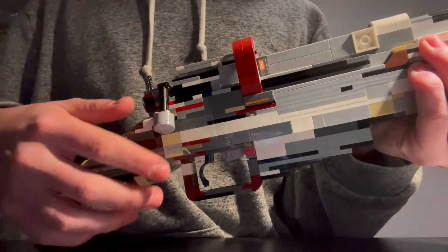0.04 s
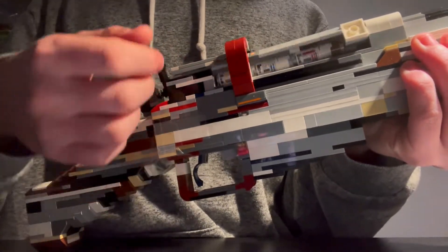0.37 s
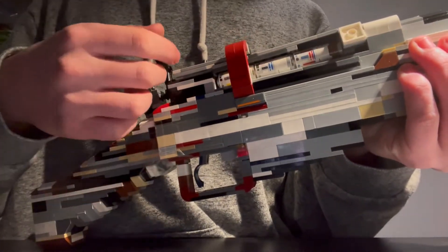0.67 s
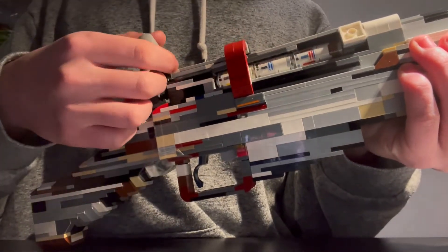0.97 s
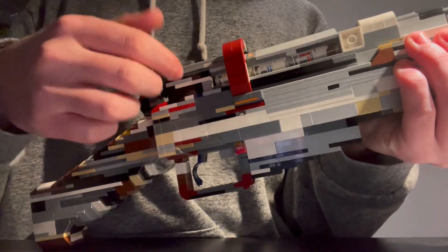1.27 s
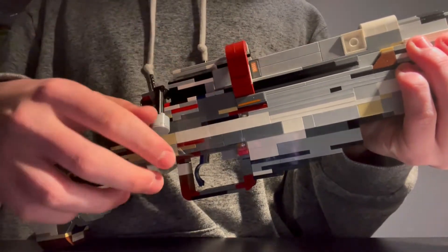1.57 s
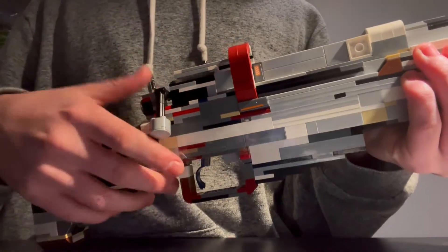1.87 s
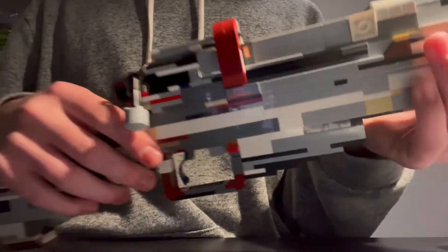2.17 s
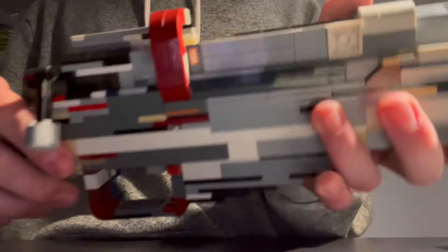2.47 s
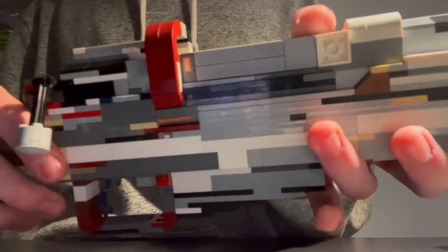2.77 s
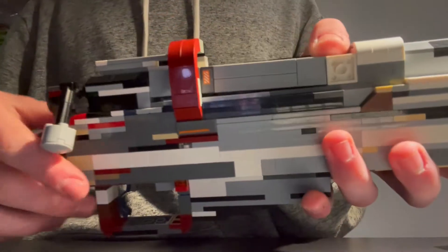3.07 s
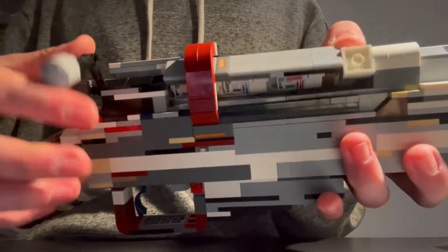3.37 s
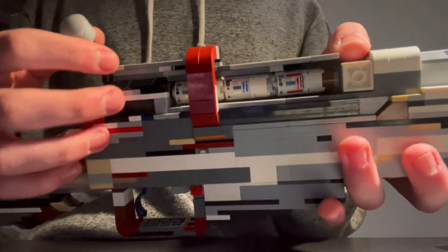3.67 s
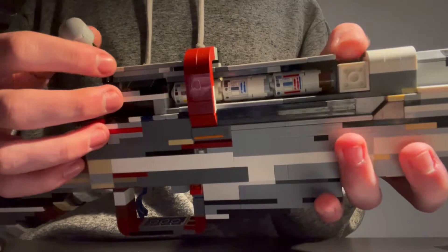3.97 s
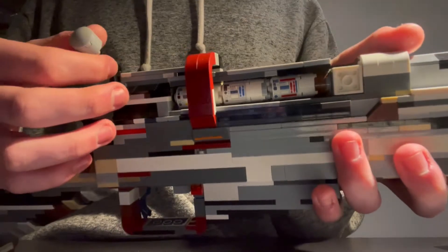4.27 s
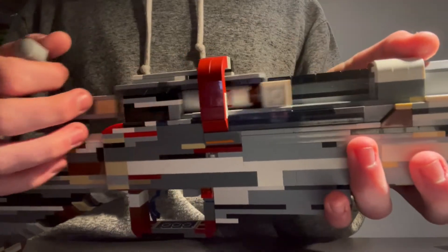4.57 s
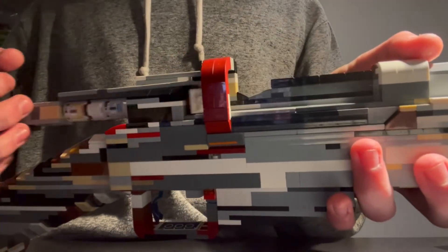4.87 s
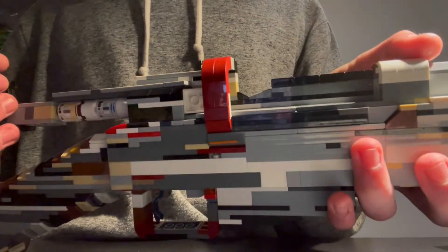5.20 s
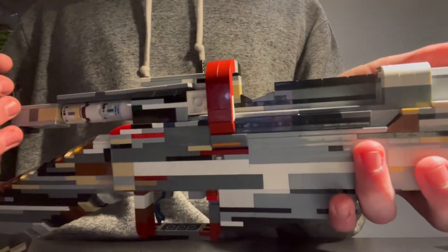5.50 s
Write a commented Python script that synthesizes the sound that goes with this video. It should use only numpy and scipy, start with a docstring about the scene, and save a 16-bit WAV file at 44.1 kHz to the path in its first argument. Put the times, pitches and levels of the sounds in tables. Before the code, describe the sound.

Hands handle a model rifle made of plastic bricks, close to a stereo microphone in a small room with a faint low hum. For the first two seconds, loose bricks click lightly and irregularly over soft finger rubs, with one sharper bolt clack at about 1.1 seconds. From 2 to 2.7 seconds a palm brushes the barrel with a faint hiss. A hollow thump lands at 2.75 seconds, and around 3 seconds fingertips stick and slip, making the body groan and rumble briefly. The bolt clacks sharply from 3.3 to 3.6 seconds, loudest near 3.5, amid rattling bricks. Another short finger groan comes around 4.1 seconds. From 4.3 seconds, sliding parts scrape under a dense run of clicks, with hard clacks at about 4.4, 4.7 and 4.9 seconds. A couple of faint ticks and a soft bump follow, ending near 5.5 seconds.

```python
"""Fingers rub and thump a hollow plastic body over a faint hum, while loose bricks click and rattle.
Hands are working the bolt of a model rifle made of plastic bricks, close by in a small quiet room.
Fingertips stick and slip, so the body groans and rumbles. Sliding parts scrape as their edges catch,
the bolt clacks against its stops, and a palm brushes along the barrel with a soft hiss."""
import sys
import numpy as np
from scipy import signal
from scipy.fft import rfft, irfft, next_fast_len
from scipy.io import wavfile
from scipy.ndimage import map_coordinates

SR = 44100
rng = np.random.default_rng(int(sys.argv[2]) if len(sys.argv) > 2 else 0)


def output_pcm(signal):
    """Save a mono or channel-first signal as 16-bit PCM at the path in sys.argv[1].

    Samples are clipped to [-1, 1] before scaling.
    """
    pcm = np.clip(np.atleast_2d(signal).T, -1, 1) * 32767
    wavfile.write(sys.argv[1], SR, np.round(pcm).astype(np.int16))


N = 244314

# Levels in the tables are relative: the functions scale them further.
# tone of the air noise: f/Hz, level/dB
AIR_TONE = [(25, -27), (48, -23.5), (87, -9.5), (123, -12), (170, -21.5), (400, -24), (800, -30.5),
            (1000, -36), (5400, -45.5), (16000, -60)]
# mains hum: f/Hz, level/dB
HUM_NOTES = [(59.3, -78), (118.6, -79)]
# fingers dragging on the body: start t/s, end t/s, midway level/dB, swell/dB, groan f/Hz
FINGER_DRAGS = [(0.038, 0.318, -60, -7.5, 200), (0.515, 0.617, -59, -11.5, 250),
                (1.304, 1.564, -61.5, -8, 225), (1.932, 1.99, -45.5, 0, 180), (2.912, 2.989, -39, 11, 244),
                (2.996, 3.076, -31.5, 0.5, 240.3), (3.089, 3.12, -40, -3.5, 250),
                (3.144, 3.43, -52.5, 1, 238), (3.632, 3.863, -52.5, -7.5, 262),
                (4.02, 4.078, -43.5, 6, 255), (4.085, 4.12, -39, 1, 240), (4.126, 4.189, -38.5, -2, 254),
                (4.568, 4.84, -58, 11, 265)]
# how the hollow body rings: f/Hz, width/Hz, knocked level/dB, rubbed level/dB
BODY_RINGS = [(255.3, 33, 3.5, -12.5), (385, 18, 0, -12.5), (475.8, 53, -1.5, -15), (647.6, 42, -6, -20.5),
              (758, 92, -4.5, -16.5)]
# how the whole model booms against the hands: f/Hz, width/Hz, level/dB
BOOM_RINGS = [(66.5, 18, 0.5), (117.7, 7.4, 0), (185, 38, -8.5)]
# how the bricks ring: f/Hz, width/Hz, level/dB
BRICK_RINGS = [(967, 33, 6), (1300, 31, 4.5), (1677, 93, -3), (2610, 83, 2.5), (3470, 260, -4),
               (3728, 110, 2), (4500, 1600, 1), (7000, 1400, 5), (10650, 420, -2)]
# tone of the rough scraping hiss: f/Hz, level/dB
GRIT_TONE = [(400, 6), (900, -4), (2300, 2), (3600, -10), (7500, -12.5), (16000, -37.5)]
# soft blows of the hands: t/s, level/dB, extra level/dB for the hollow ring
HAND_BLOWS = [(0.065, -48.5, 11), (1.518, -44.5, 0), (1.95, -40, 6), (2.746, -22, 13.5),
              (2.756, -24.5, 17.5), (4.645, -40.5, -2), (4.891, -36.5, 1), (5.364, -42.5, -31.5)]
# bricks sliding on bricks: start t/s, end t/s, midway level/dB, swell/dB
BRICK_SLIDES = [(0.12, 0.26, -62, -2), (0.48, 0.59, -68, -1), (1.075, 1.15, -43, -13),
                (2.02, 2.2, -63.5, -9), (2.728, 2.83, -49, -11), (3.495, 3.57, -47.5, -3.5),
                (4.29, 4.56, -49, 1.5), (4.57, 4.87, -60.5, -5)]
# loose bricks tapping: t/s, clack level/dB, clack f/Hz, snap level/dB above the clack
BRICK_TAPS = [(0.1292, -32.5, 1480, -18), (0.189, -33, 1320, -20), (0.2012, -37, 1500, -32),
              (0.2304, -34, 1510, -13), (0.319, -42, 1090, -16), (0.401, -54.5, 1230, -24),
              (0.4738, -35.5, 1670, -17), (0.682, -56, 1530, -21), (1.016, -47, 1340, 1),
              (1.09, -36.5, 1000, -2.5), (1.1727, -31, 1470, -17), (1.2385, -43.5, 1440, -42),
              (1.276, -46.5, 1375, -17), (1.3368, -36, 1400, -13), (1.3936, -40, 1240, -37.5),
              (1.4274, -37.5, 1430, -11.5), (1.523, -36.5, 1360, -10.5), (1.5939, -52, 1260, -6),
              (1.951, -42.5, 1540, -5.5), (2.0246, -45.5, 1720, -3), (2.0423, -35.5, 1220, 1),
              (2.174, -48, 1580, -21), (2.421, -51.5, 1550, -11), (2.4792, -42, 1346, -5),
              (2.749, -22, 725, -13), (2.826, -40, 1420, -36), (3.0491, -32.5, 1264, -10),
              (3.09, -35.5, 1100, -7), (3.185, -40.5, 1280, -12), (3.2636, -37, 1700, -15),
              (3.3777, -28.5, 1720, -9), (3.44, -33, 1520, 1), (3.5319, -24.5, 1840, 4),
              (3.571, -25.5, 2700, -16), (3.6263, -27, 1794, -13), (3.659, -40, 1710, -22.5),
              (3.7368, -40, 1340, -10), (3.8255, -44.5, 1165, -16), (3.863, -49, 1380, -37),
              (3.885, -44, 1500, -29), (4.0418, -38, 1320, -10.5), (4.1534, -30.5, 1380, -20),
              (4.1694, -44, 1130, -0.5), (4.277, -43.5, 1570, -20.5), (4.293, -34.5, 1300, -9.5),
              (4.3218, -27.5, 1530, -6), (4.336, -30, 1510, -26), (4.4866, -24, 1380, -14),
              (4.5068, -22.5, 1750, -24), (4.5131, -26, 1840, -13), (4.5349, -26.5, 1290, 0.5),
              (4.5402, -25, 1400, 0), (4.5462, -25, 1746, -22.5), (4.5579, -34, 1593, -2.5),
              (4.639, -35.5, 1730, -29.5), (4.654, -35, 2010, -29), (4.676, -28, 1462, -18),
              (5.0889, -52.5, 1703, -40.5), (5.4138, -48.5, 1710, -16)]
# the bolt hitting a catch or its stop:
# t/s, clack level/dB, main note f/Hz, second note f/Hz, snap level/dB above the clack, knock level/dB
BOLT_HITS = [(1.105, -20, 2050, 2614, -6.5, -42), (3.349, -17.5, 2888, 1894, -13.5, -26),
             (3.4899, -11, 1629, 2590, -13.5, -18.5), (3.5376, -11.5, 2610, 2020, 0, -25),
             (4.4302, -20.5, 810, 2430, -7, -31.5), (4.6663, -18.5, 1390, 1905, 1, -18.5),
             (4.8839, -14, 1680, 947, -16.5, -24.5)]
# palm sweeping along the barrel: start t/s, end t/s, midway level/dB, swell/dB
PALM_SWEEPS = [(1.815, 1.835, -64.5, -15), (2.03, 2.24, -64.5, 5.5), (2.24, 2.4, -71, -2),
               (2.46, 2.53, -59.5, 1), (2.62, 2.69, -67.5, -13), (3.04, 3.11, -65.5, 7.5)]
# tone of the soft brushing hiss, brightest near 7 kHz: f/Hz, level/dB
BRUSH_TONE = [(500, -12), (1500, -7.5), (3500, -4.5), (7300, 1), (10300, -5.5), (12000, -24),
              (16000, -12.5)]
# how long the room rings: f/Hz, t/s to fade by 60 dB
ROOM_FADE = [(100, 0.24), (500, 0.21), (2500, 0.16), (12000, 0.29)]
# stereo width of the microphone pair: f/Hz, side level/dB (side is left minus right)
STEREO_WIDTH = [(100, -8), (500, -1.5), (2500, 1.5), (5000, -1), (8500, -10.5), (11300, 11.5), (14000, 0.5)]

FIRM_DB = -37  # a finger drag at this level counts as firm
GRAZE_S = .007  # parts touch this long before they hit


def amp(db):
    """Turn decibels into a gain."""
    return 10 ** (np.asarray(db) / 20)


def unit(x):
    """Scale a sound to an average (rms) level of 1."""
    return x / np.sqrt(np.mean(x ** 2) + 1e-20)


def burst(x):
    """Give a short sound the energy of 10 ms at level 1."""
    return unit(x) * np.sqrt(SR / 100 / x.shape[-1])


def along(points, hz):
    """Read between (f/Hz, value) points, spaced by pitch."""
    f, values = np.transpose(points)
    return np.interp(np.log(hz + 1), np.log(f), values)


def wobble(rate):
    """A smooth random curve through rate points a second."""
    points = rng.standard_normal(int(N * rate / SR) + 4)
    return map_coordinates(points, [np.arange(N) * rate / SR])


def filtered(x, response):
    """Multiply each frequency in x by response(hz)."""
    n = x.shape[-1]
    padded = next_fast_len(n + SR // 4)
    return irfft(rfft(x, padded) * response(np.fft.rfftfreq(padded, 1 / SR)), padded)[..., :n]


def resonate(x, rings):
    """Make x ring at each row of f/Hz, width/Hz, level/dB; further columns are ignored."""
    return sum((-1) ** k * amp(db) * signal.lfilter(*signal.iirpeak(hz, hz / width, SR), x)
               for k, (hz, width, db, *_) in enumerate(rings))


def band(x, kind, hz):
    """Keep what is below ("low") or above ("high") hz."""
    return signal.sosfilt(signal.butter(4, hz, kind, fs=SR, output="sos"), x)


def stereo_noise(n, side_db):
    """Left and right noise; more side_db makes it wider."""
    mid, side = rng.standard_normal((2, n))
    return np.array([mid + amp(side_db) * side, mid - amp(side_db) * side])


def hiss(tone, side_db):
    """Stereo noise shaped by a tone table, at level 1."""
    return unit(filtered(stereo_noise(N, side_db), lambda hz: amp(along(tone, hz))))


def add(track, s, sound):
    """Mix a sound into the track at s seconds."""
    part = track[:, round(s * SR):][:, :sound.shape[-1]]
    part += sound[..., :part.shape[-1]]


def strokes(rows, attack_s=0.026, release_s=0.016):
    """Loudness over time: each stroke gets going, presses harder or eases off, then dies away."""
    t, gain = np.arange(N) / SR, np.zeros(N)
    for start, end, db, swell_db, *_ in rows:
        progress = np.clip((t - start) / (end - start), 0, 1)
        attack = np.clip((t - start) / attack_s, 0, 1)
        release = np.exp(-np.maximum(t - end, 0) / release_s)
        gain += amp(db + swell_db * (progress - .5)) * attack * release
    return gain


def pressure():
    """How hard the fingers drag: 1 for a firm drag."""
    return strokes(FINGER_DRAGS) / amp(FIRM_DB)


def background():
    """Air noise, mains hum and a thin electrical whine."""
    t = np.arange(N) / SR
    hum = sum(amp(db + wobble(6.8)) * np.sqrt(2) * np.sin(2 * np.pi * hz * t) for hz, db in HUM_NOTES)
    whine = unit(resonate(stereo_noise(N, side_db=4), [(5460, 75, 0)]))
    return amp(-68.5) * hiss(AIR_TONE, side_db=0.5) + hum + amp(-96.5) * whine


def finger_judder():
    """Fingertips stick and slip on the hollow body: a light drag mutters, a firm one groans."""
    t, out = np.arange(N) / SR, np.zeros((2, N))
    drift = t + 0.05985 * np.cumsum(wobble(70)) / SR  # the pitch wanders by about 6%
    slips = unit(band(stereo_noise(N, side_db=-5.5), "low", 42))  # uneven slips blur the pitch
    rubbed_rings = [(hz, width, db) for hz, width, _, db in BODY_RINGS]
    burr = unit(band(resonate(stereo_noise(N, side_db=-1), rubbed_rings), "low", 1700))
    rasp = unit(resonate(stereo_noise(N, side_db=-9), [(4500, 950, 0)]))
    for drag in FINGER_DRAGS:
        _, _, db, _, hz = drag
        tone_share = 1 / (1 + amp(FIRM_DB - db) / 2)
        phase = 2 * np.pi * hz * drift
        groan = np.sqrt(2 * tone_share) * np.sin(phase)
        mutter = np.sqrt(2 - 2 * tone_share) * slips * np.cos(phase)
        out += strokes([drag]) * (groan + mutter + amp(-10) * burr + amp(-31) * rasp)
    flutter = amp(3 * wobble(40))
    return flutter * out


def finger_rumble():
    """Dragging fingers rock the whole model, so it booms quietly."""
    rocking = band(resonate(stereo_noise(N, side_db=-11), BOOM_RINGS), "high", 50)
    return amp(-55) * pressure() ** 0.23 * unit(rocking)


def brick_scrape():
    """Edges and studs catch again and again as parts slide, ringing the bricks and the body."""
    catches = rng.random(N) < 550 / SR  # about 550 a second
    sizes = amp(4.5 * np.minimum(rng.exponential(size=N), 3))
    t = np.arange(SR // 100) / SR
    fade = amp(-60 * t / .004)
    grains = signal.fftconvolve(catches * sizes, fade)[:N] * stereo_noise(N, side_db=-5)
    ticks = unit(band(band(resonate(grains, BRICK_RINGS), "low", 2000), "high", 900))
    hollow = unit(band(resonate(grains, BODY_RINGS[1:]), "low", 1000))
    chafing = amp(-60.5) * pressure() ** 0.62  # finger drags make the bricks chafe too
    sliding = strokes(BRICK_SLIDES) + chafing
    return sliding * unit(ticks + amp(-2) * hollow + amp(-2.5) * hiss(GRIT_TONE, side_db=-2.5))


def hand_thumps():
    """A soft hand shoves the whole model and makes its hollow ring."""
    out, t = np.zeros((2, N)), np.arange(SR // 4) / SR
    push = t * np.exp(-t / 0.0013)
    hollow = burst(resonate(push, BODY_RINGS))
    for s, db, hollow_db in HAND_BLOWS:
        grip = np.exp(0.0077 * rng.standard_normal())  # each grip tunes the model a little
        boom = burst(resonate(push, [(hz * grip, width, level) for hz, width, level in BOOM_RINGS]))
        add(out, s, amp(db + 0.5) * boom + amp(db + hollow_db - 16) * hollow)
    return band(out, "high", 79)


def contact(t, rise_s, fade_s, side_db):
    """Two parts touch: a tiny puff of noise that swells and dies."""
    return stereo_noise(len(t), side_db) * (1 - np.exp(-(t / rise_s) ** 2)) * amp(-60 * t / fade_s)


def graze(db):
    """Parts chafe for a moment just before they hit."""
    t = np.arange(SR // 20) / SR
    chafe = contact(t, rise_s=0.0078, fade_s=0.043, side_db=-11)
    return amp(db - 21) * burst(band(resonate(chafe, BRICK_RINGS), "low", 3800))


def bounces(t, gap_s, fall_db, count):
    """A brick lands, then bounces a few times at uneven gaps, dying away."""
    delays = np.r_[0, np.cumsum(gap_s * rng.uniform(.3, 1.7, count))]
    sizes = amp(-fall_db * np.arange(count + 1)) * np.r_[1, rng.uniform(-1, 1, count)]
    return np.bincount((delays * SR).astype(int), sizes, len(t))[:len(t)]


def plastic_note(t, hz, fade_s=.018):
    """A struck part rings briefly, a little out of step in left and right."""
    phase = rng.uniform(0, 2 * np.pi) + np.array([[0], [rng.uniform(-0.6, 0.67)]])
    rise = 1 - np.exp(-(t / 0.00083) ** 2)
    return burst(np.sin(2 * np.pi * hz * t + phase) * rise * amp(-60 * t / fade_s))


def strike(db, hz, notes, snap_db, stud_hz, knock_db):
    """One hit: a dry clack with short notes, a bright snap with a stud's ring, and a hollow knock."""
    t = np.arange(SR // 10) / SR
    landings = bounces(t, gap_s=.0014, fall_db=1.5, count=6)
    touch = contact(t, rise_s=0.0021, fade_s=0.0031, side_db=-5)
    contacts = signal.fftconvolve(touch, landings[None], axes=1)[:, :len(t)]
    tuning = np.exp(.065 * rng.standard_normal())  # every piece has a size of its own
    ring = resonate(contacts, [(f * tuning, width, level) for f, width, level in BRICK_RINGS])

    rattle = burst(ring) + amp(-5.5) * burst(band(contacts, "low", 3600))
    broad = resonate(rattle, [(hz, .6 * hz, 0)])
    crisp = burst(filtered(broad, lambda f: f ** 4 / np.hypot(f ** 4, 640 ** 4)))  # bass cut, no delay
    clack = burst(crisp + sum(amp(level) * plastic_note(t, f) for f, level in notes))

    stud = burst(resonate(contacts, [(stud_hz, 1000, 0)]))
    treble = burst(band(contacts, "high", 9100)) + amp(8) * burst(band(ring, "high", 4200))
    snap = burst(treble + amp(1.5) * stud)

    jolt = contact(t, rise_s=0.0045, fade_s=0.018, side_db=1)
    knock = burst(band(resonate(jolt, BODY_RINGS), "low", 1600))
    return amp(-11.5) * (amp(db) * clack + amp(db + snap_db) * snap + amp(knock_db) * knock)


def brick_clicks(ordinary_db=-33):
    """Loose bricks tap each other. The knock grows more slowly than the clack, so soft taps are duller."""
    out = np.zeros((2, N))
    for s, db, hz, snap_db in BRICK_TAPS:
        notes = [(f, -8.5) for f in hz * rng.uniform(.55, 1.7, 2)]  # f/Hz, level/dB
        knock_db = -36.5 + 0.59 * (db - ordinary_db)
        add(out, s - GRAZE_S, graze(db))
        stud_hz = rng.uniform(7700, 8400)
        add(out, s, strike(db, hz, notes, snap_db, stud_hz, knock_db))
    return out


def bolt_clacks(catch_hz=11160):
    """The bolt grazes its catch, then hits it with two short notes."""
    out = np.zeros((2, N))
    for s, db, main_hz, second_hz, snap_db, knock_db in BOLT_HITS:
        notes = [(main_hz, -7.5), (second_hz, -11.5)]  # f/Hz, level/dB
        add(out, s - GRAZE_S, graze(db))
        add(out, s, strike(db, main_hz, notes, snap_db, catch_hz, knock_db))
    return out


def palm_brush():
    """Dry skin sweeps over smooth plastic: a hiss that flutters with the speed of the palm."""
    flutter = amp(2.4 * wobble(45.33))
    sweeping = strokes(PALM_SWEEPS, attack_s=0.019, release_s=0.035)
    return flutter * sweeping * hiss(BRUSH_TONE, side_db=-4.5)


def room_echo(x, stretches=14):
    """The table and walls answer after 5 ms; the echo changes as the model moves."""
    echo = np.zeros((2, N))
    for part in np.array_split(np.arange(N), stretches):
        hz, t, spectrum = signal.stft(stereo_noise(SR // 2, side_db=2), SR, nperseg=256)
        fade = amp(-60 * t / along(ROOM_FADE, hz)[:, None])
        tail = signal.istft(spectrum * fade, SR, nperseg=256)[1]
        tail = np.pad(tail / np.linalg.norm(tail[0]), ((0, 0), (SR // 200, 0)))
        # neighbouring stretches fade into each other
        share = np.maximum(1 - np.abs(np.arange(N) - part.mean()) / len(part), 0)
        near = np.flatnonzero(share)
        add(echo, near[0] / SR, signal.fftconvolve((x * share)[:, near], tail, axes=1))
    return filtered(echo, lambda f: amp(along([(200, 0.5), (900, -7.5), (3000, -8.5), (7000, -16)], f)))


def scene():
    """The model in the room; its body sounds a little to the left."""
    air_and_hum = background()
    body = (hand_thumps() + finger_judder() + finger_rumble()) * amp([[1.5], [-1.5]])
    model = bolt_clacks() + brick_clicks() + brick_scrape() + palm_brush() + body
    return model + room_echo(model) + air_and_hum


def record(dry):
    """Two spaced microphones: the left hears slightly later, and the high treble sounds widest."""
    left_delay_s, top_hz = .00009, 16300
    left = filtered(dry[0], lambda hz: np.exp(-2j * np.pi * hz * left_delay_s))
    mid = (left + dry[1]) / 2
    side = filtered((left - dry[1]) / 2, lambda hz: amp(along(STEREO_WIDTH, hz)))
    return filtered(np.array([mid + side, mid - side]), lambda hz: 1 / (1 + (hz / top_hz) ** 120))


dry = scene()
out = record(dry)
output_pcm(out)
```